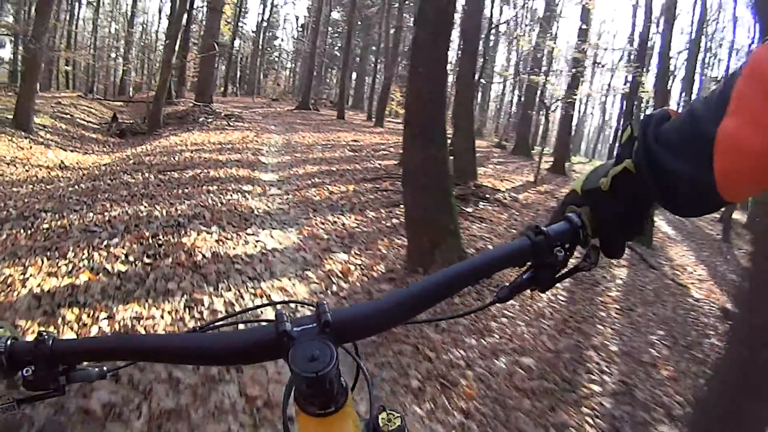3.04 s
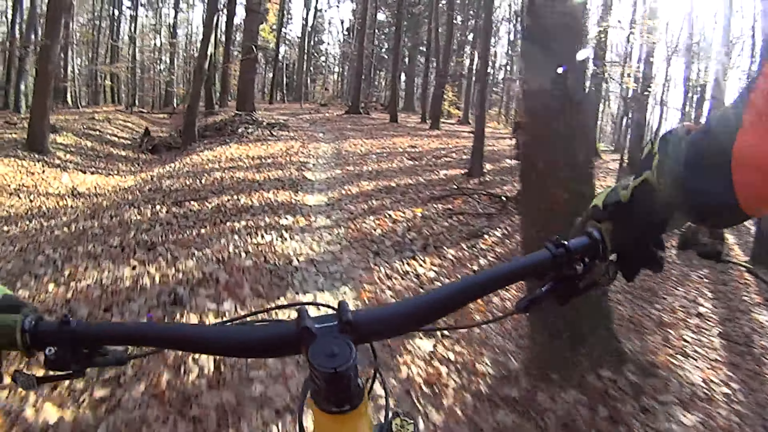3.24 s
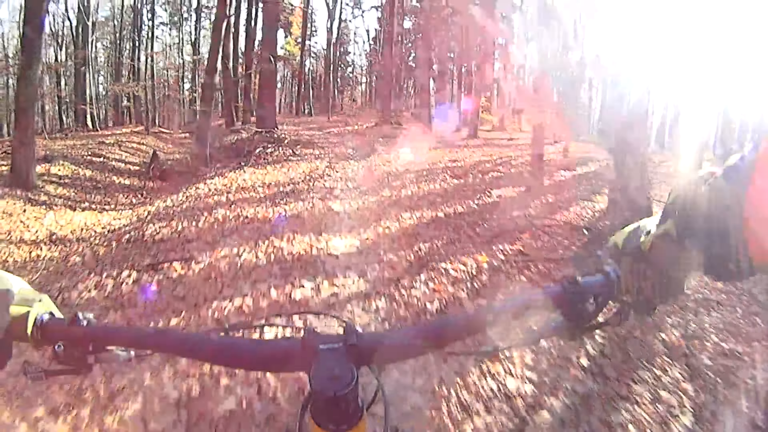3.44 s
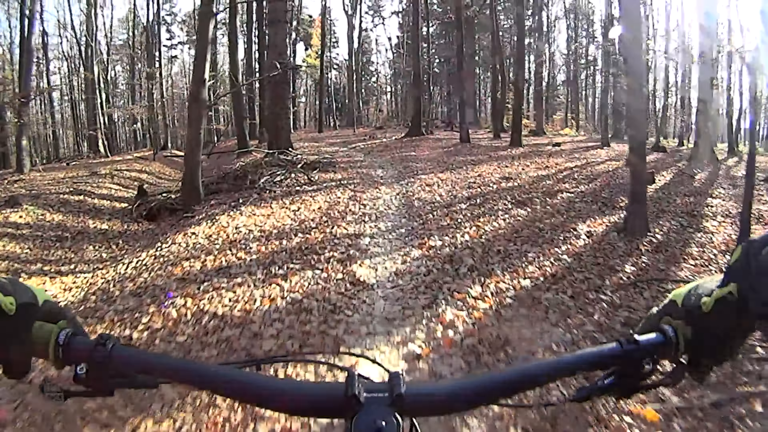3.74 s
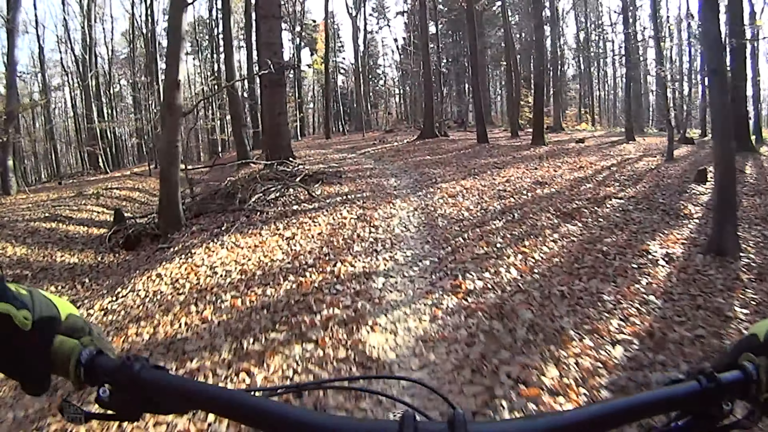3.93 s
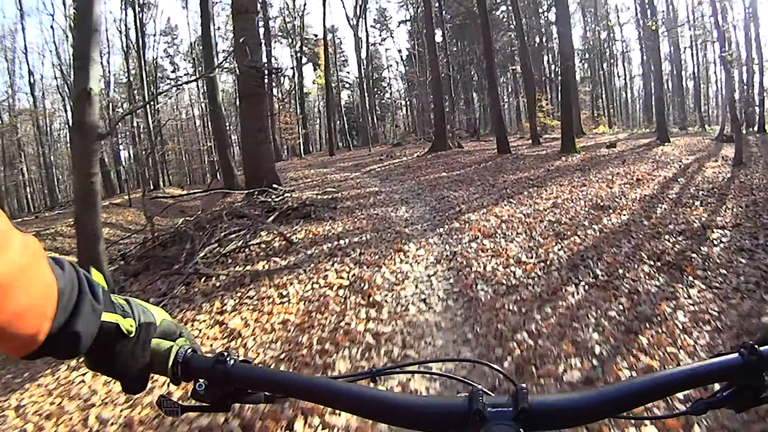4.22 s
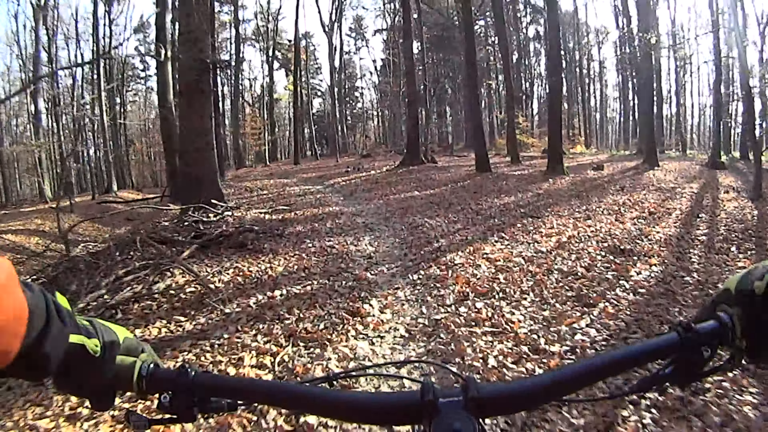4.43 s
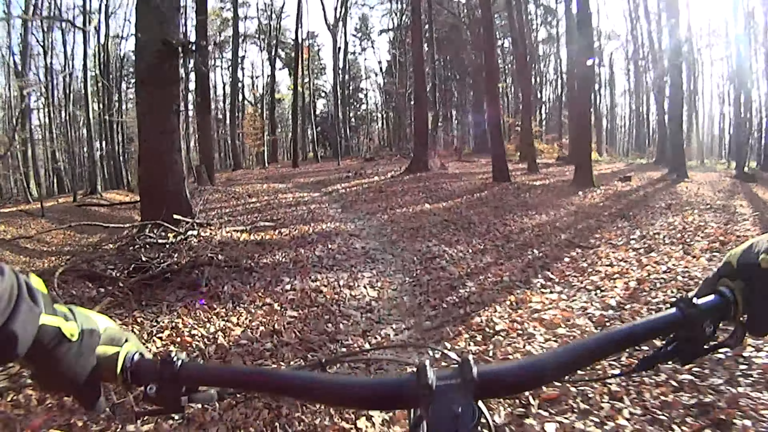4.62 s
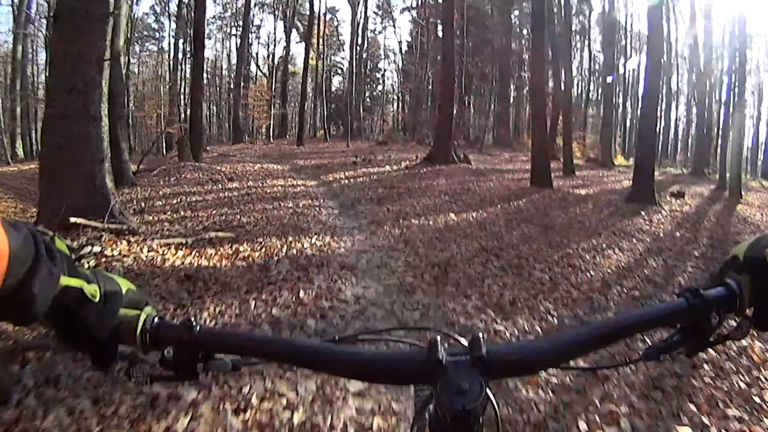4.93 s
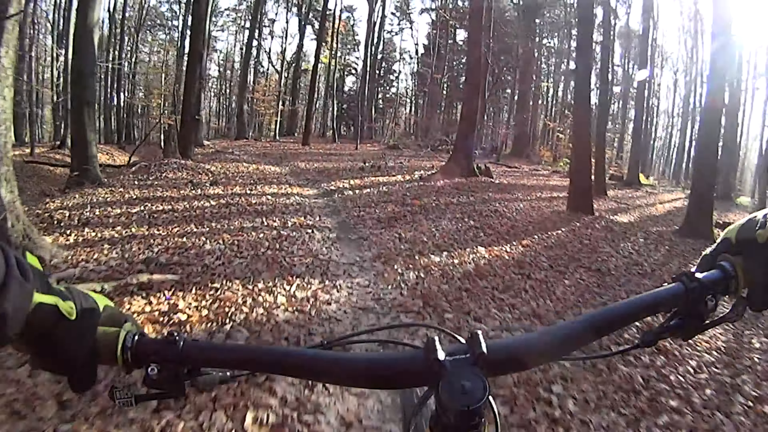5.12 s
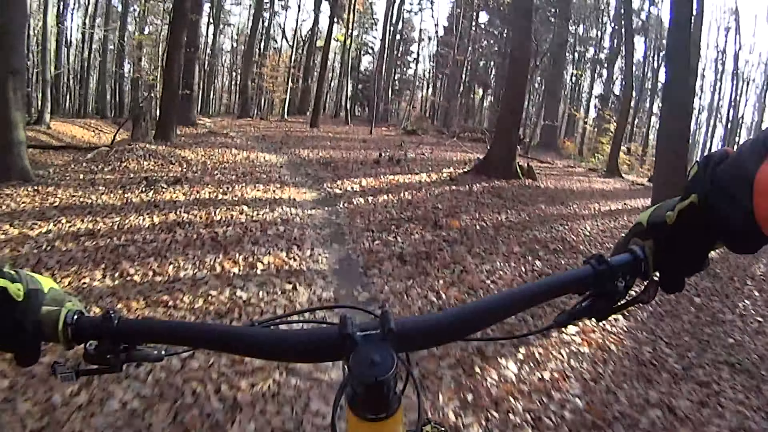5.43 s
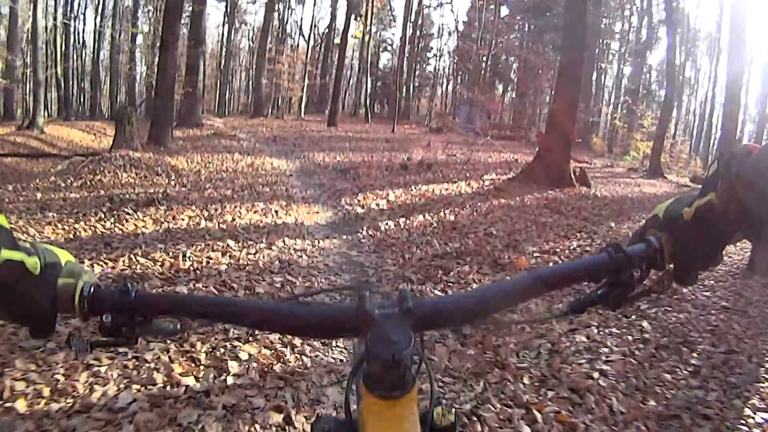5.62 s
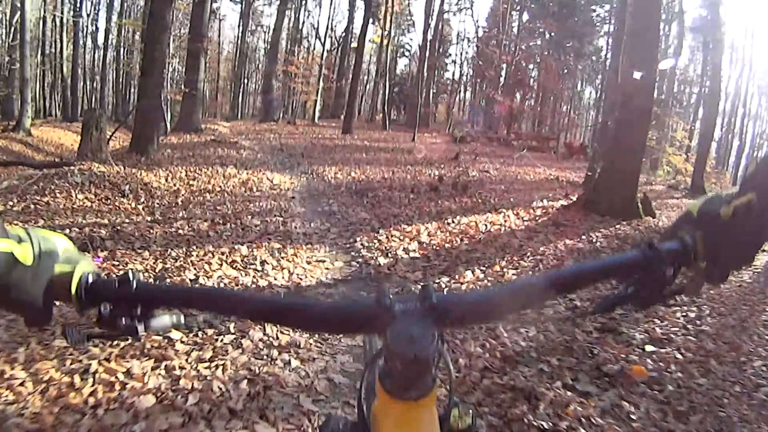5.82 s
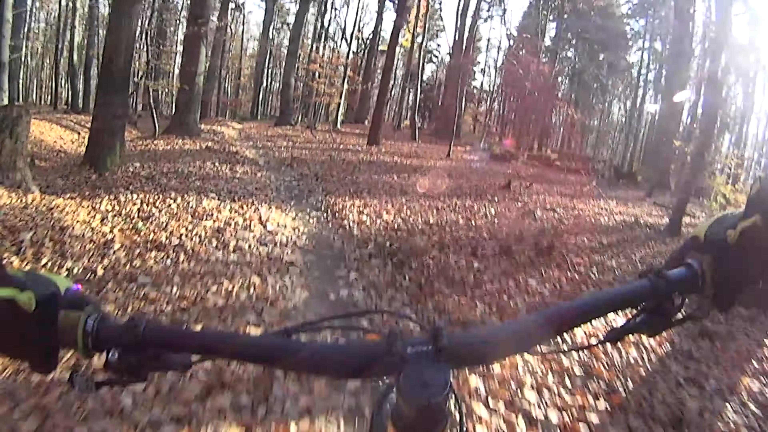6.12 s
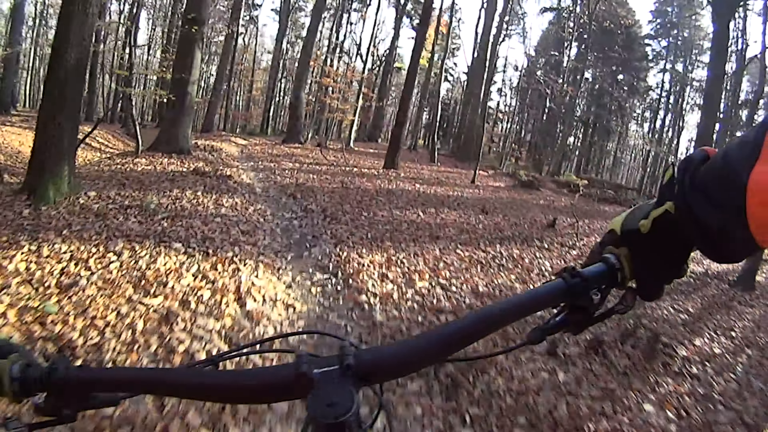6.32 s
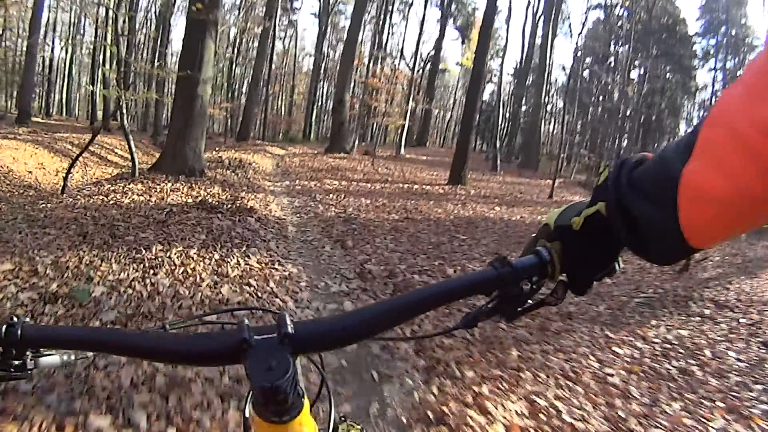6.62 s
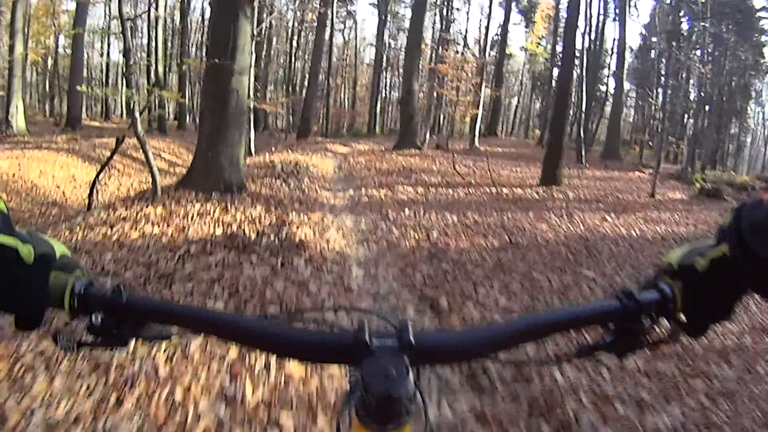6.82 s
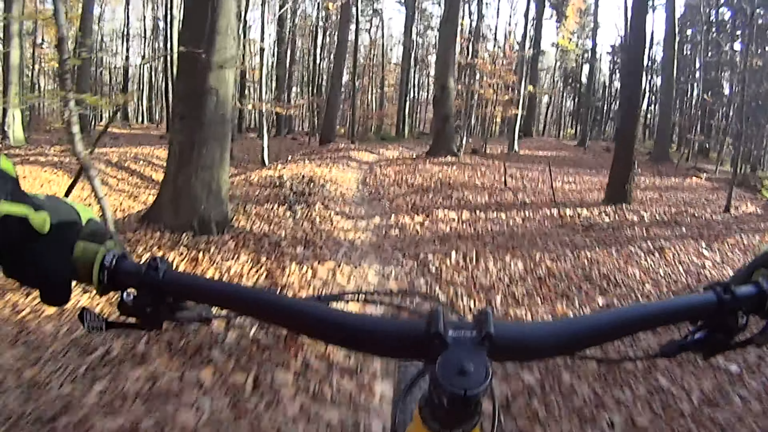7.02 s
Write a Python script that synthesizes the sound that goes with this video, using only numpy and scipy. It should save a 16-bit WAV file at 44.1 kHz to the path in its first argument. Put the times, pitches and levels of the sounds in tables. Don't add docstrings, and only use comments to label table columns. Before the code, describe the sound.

From 0 s bicycle tyres roll steadily through deep dry leaves, a continuous crisp rustle full of tiny crackles, with sharp cracks of stiff leaves and twigs. The microphones sit close in a closed plastic case, so everything is hard, boxy and narrow, over a faint low rumble of wind and jolts. A strong knock comes at 0.6 s, a few twig snaps at 1.9 s. Around 2.5 s the rattle nearly fades, leaving mostly leaves, then a light bump at 2.7 and a double knock at 3.75. From 5.3 to 6.1 s the trail is rough: grinding, knocks and one loud snap at 5.5. More clacks follow at 6.8 with a low thump. At 7.65-8.05 a violent clatter and deep jolts hit, then thick, loud leaf crunching around 8.2, a brief lightening near 8.65 amid a flurry of snaps at 8.5-8.85, and final heavy knocks at 8.9-9 s.

```python
import sys
import numpy as np
from scipy import signal
from scipy.fft import rfft, irfft
from scipy.io import wavfile
from scipy.ndimage import uniform_filter1d

SR = 44100
rng = np.random.default_rng(int(sys.argv[2]) if len(sys.argv) > 2 else 0)


def digitize_waveform(pressure):
    field = np.atleast_2d(pressure).T
    bounded = np.clip(field, -1, 1)
    quanta = np.round(bounded * 32767).astype(np.int16)
    wavfile.write(sys.argv[1], SR, quanta)


def nominal_scale(level):
    x = np.asarray(level, float) / 20
    return 10 ** x


N = 399546

# top t/s, length/s, level/dB
HEAP_ROWS = [(0.12, 0.027, 1.5), (0.22, 0.058, -4), (0.25, 0.043, 3), (0.585, 0.035, 4), (0.66, 0.042, 4),
             (0.785, 0.052, 3.5), (0.87, 0.053, 4.5), (1.26, 0.027, 1.5), (1.59, 0.061, 4.5),
             (2.45, 0.032, 2.5), (2.52, 0.024, 1.5), (3.37, 0.047, 5), (5.07, 0.085, 0.5),
             (5.22, 0.042, 5.5), (5.85, 0.03, 6.5), (6.88, 0.11, 3), (7.69, 0.03, 9), (7.77, 0.096, -3),
             (7.89, 0.026, 4), (8.0, 0.076, 5), (8.08, 0.066, 3), (8.18, 0.08, 3.5), (8.25, 0.043, 4.5),
             (8.37, 0.041, 3.5), (8.47, 0.07, 0.5), (8.63, 0.09, -4), (8.7, 0.05, -6.5), (8.76, 0.027, 0),
             (8.81, 0.016, -4)]
# t/s, shaking/dB
SHAKING_ROWS = [(0.0, 2), (0.6, 6.5), (1.2, 3), (2.0, -5.5), (2.5, -11), (2.85, 1), (3.2, -1.5), (4.9, 1),
                (5.3, 7), (5.7, 7.5), (6.25, 5.5), (6.8, 8), (7.2, 5.5), (7.6, 7.5), (7.85, 21),
                (8.25, 0.5), (8.6, 10.5), (9.06, 13)]
# start t/s, length/s, level/dB
GRIND_ROWS = [(0.345, 0.053, -34.5), (0.98, 0.022, -32.5), (1.69, 0.052, -36.5), (2.67, 0.063, -40),
              (2.88, 0.08, -41.5), (3.75, 0.043, -31.5), (4.06, 0.025, -47), (4.715, 0.047, -42.5),
              (5.36, 0.027, -36), (5.545, .04, -33), (5.603, 0.077, -31.5), (5.685, 0.063, -33.5),
              (5.83, 0.054, -36), (5.905, 0.042, -33), (6.41, .04, -41), (6.495, 0.025, -40),
              (6.64, 0.026, -33), (6.78, 0.08, -45), (6.94, .04, -38), (7.01, 0.032, -38.5),
              (7.648, 0.036, -28), (7.72, 0.026, -36), (7.745, .04, -27), (7.85, .07, -43),
              (7.93, 0.03, -34), (7.975, 0.048, -27), (8.568, 0.089, -25), (8.74, 0.15, -36),
              (8.87, 0.076, -29), (8.995, .07, -26)]


def evened(x):
    return x / np.sqrt(np.mean(x ** 2) + 1e-20)


def read(points, hz, axis=1):
    table = np.transpose(points)
    return np.interp(np.log(hz + 1), np.log(table[0] + 1), table[axis])


def curve(rows):
    return np.interp(np.arange(N) / SR, *np.transpose(rows))


def add(mix, s, sound):
    part = mix[max(round(s * SR), 0):][:len(sound)]
    part += sound[:len(part)]


def causal(gain_db):
    mirrored_db = np.concatenate([gain_db, gain_db[-2:0:-1]])
    log_gain = np.log(nominal_scale(mirrored_db))
    response = np.exp(np.conj(signal.hilbert(log_gain)))
    return np.fft.ifft(response).real[:1024]


def flicker(per_s, depth_db):
    span = max(int(SR / per_s / 2), 1)
    smooth = uniform_filter1d(uniform_filter1d(rng.standard_normal(N), span), span)
    return nominal_scale(depth_db * evened(smooth))


def random_hits(per_s, spread_db, largest):
    size = nominal_scale(spread_db * np.minimum(rng.exponential(1, N), largest))
    return size * (rng.random(N) < per_s / SR)


def grains(per_s, spread_db, low_hz, high_hz, cycles, patchy_db, count=14):
    size = random_hits(per_s, spread_db, largest=2.5)
    kind = rng.integers(0, count, N)
    t = np.arange(512) / SR
    out = np.zeros(N)
    for k, hz in enumerate(np.geomspace(low_hz, high_hz, count)):
        ring = np.sin(2 * np.pi * hz * t) * np.exp(-t * hz / cycles)
        ring = ring / np.linalg.norm(ring) * np.sqrt(hz)
        clicks = size * (kind == k) * flicker(21, patchy_db)
        out += signal.oaconvolve(clicks, ring)[:N]
    return evened(out)


def bursts(per_s, spread_db, fade_s):
    starts = random_hits(per_s, spread_db, largest=3)
    fading = signal.lfilter([1], [1, -np.exp(-1 / (fade_s * SR))], starts)
    gain = 0.64 + evened(fading)
    return gain / uniform_filter1d(gain, SR // 12)


def patchy(depth_db):
    z = signal.stft(rng.standard_normal(N + 512), nperseg=256, noverlap=192)[2]
    patches = uniform_filter1d(rng.standard_normal(z.T.shape), size=26, axis=0)
    patches = uniform_filter1d(patches, size=4, axis=1)
    coloured = z * nominal_scale(depth_db * evened(patches.T))
    return evened(signal.istft(coloured, nperseg=256, noverlap=192)[1][:N])


def swells(rows):
    out = np.zeros(N)
    for s, length, height in rows:
        u = np.linspace(0, 1, round(2 * length * SR))
        add(out, s - 0.63 * length, height * np.sin(np.pi * u ** 0.6) ** 2)
    return out


def scrapes(rows):
    rise_s = 0.002
    out = np.zeros(N)
    for s, length, db in rows:
        t = np.arange(0, length, 1 / SR)
        fall = np.cos(np.pi / 2 * t / t[-1])
        add(out, s, nominal_scale(db) * np.minimum(t / rise_s, 1) * fall)
    return out


def leaves():
    # t/s, crush level/dB
    leaf_depth = [(0.0, -31.5), (0.35, -33.5), (0.7, -33.5), (1.0, -32.5), (1.34, -29.5), (1.64, -28),
                  (2.15, -28), (2.4, -31.5), (2.75, -27), (3.13, -32), (3.7, -27), (4.4, -31), (5.6, -29.5),
                  (6.45, -32.5), (6.9, -27), (7.75, -30), (8.23, -22.5), (9.06, -28.5)]
    bump_crunch = 0.05
    dull_hz, dull_lags, usual_db = 3800, 0.32, -32.5

    crunch = bursts(70, spread_db=4.5, fade_s=0.0074)
    bed = patchy(depth_db=1.5) * (0.95 + 0.1 * crunch) * flicker(24, depth_db=1.07)
    crackle = grains(2600, spread_db=3.0, low_hz=1840, high_hz=6850, cycles=1.3, patchy_db=7.5)
    crackle = crackle * (0.063 + 0.45 * crunch)
    ticks = grains(140, spread_db=1.5, low_hz=2840, high_hz=5170, cycles=2.2, patchy_db=-3.0, count=3)
    texture = nominal_scale(1.0) * bed + nominal_scale(-7.0) * crackle + nominal_scale(-15) * ticks

    level_db = curve(leaf_depth) + swells(HEAP_ROWS)
    crush = (nominal_scale(level_db) + bump_crunch * scrapes(GRIND_ROWS)) * texture
    dull = signal.lfilter(*signal.butter(1, dull_hz, fs=SR), crush)
    bright = crush - dull
    return bright + dull * nominal_scale(-dull_lags * (level_db - usual_db))


def rattle():
    rest_db = -49.5
    skip_quiets = 0.93

    chatter = grains(3000, spread_db=1.5, low_hz=433, high_hz=2173, cycles=2.45, patchy_db=1.5)
    chatter = chatter * (1.9 + 0.5 * bursts(98, spread_db=9.5, fade_s=0.0071))
    steady = chatter / np.sqrt(uniform_filter1d(chatter ** 2, size=1500) + 1e-6)
    calm_db = skip_quiets * np.minimum(swells(HEAP_ROWS), 0)
    level = nominal_scale(rest_db + curve(SHAKING_ROWS) + calm_db) + scrapes(GRIND_ROWS)
    flecks = grains(28, spread_db=2.0, low_hz=1330, high_hz=1500, cycles=3.1, patchy_db=0.0, count=2)
    return nominal_scale(-51) * flecks + nominal_scale(5.5) * level * steady


def rumble():
    # f/Hz, level/dB
    wind_colour = [(20, 6), (45, -2.5), (105, -3.5), (160, -3), (250, -6.5), (400, -10.5), (700, -18),
                   (1500, -28.5)]
    # t/s, peak level/dB, f/Hz
    root_jolts = [(0.617, -36, 127), (2.69, -40, 140), (5.354, -27, 127), (5.525, -26.5, 128),
                  (5.686, -30.5, 78.6), (5.906, -32, 58), (6.489, -32, 150), (6.633, -32.5, 61.5),
                  (6.809, -22, 105), (6.995, -34, 90.5), (7.411, -47, 83.4), (7.706, -19.5, 108),
                  (7.795, -15, 90.5), (7.878, -17.5, 135), (7.984, -25, 71.5), (8.051, -23, 71.4),
                  (8.63, -27.5, 109), (8.863, -18.5, 102), (8.913, -17, 89), (8.988, -23.5, 116)]
    wind_db, follows = -50, 0.29
    rise_s, stirs_s, stirs_db = 0.0183, 0.038, -16

    hz = np.fft.rfftfreq(N, 1 / SR)
    bounce_db = 4 / (1 + ((hz - 102) / 25) ** 2)
    colour = nominal_scale(read(wind_colour, hz) + bounce_db)
    both, own = (evened(irfft(rfft(rng.standard_normal(N)) * colour, N)) for _ in range(2))
    stirred = swells([(s + rise_s, stirs_s, nominal_scale(db + stirs_db)) for s, db, _ in root_jolts])
    level = nominal_scale(wind_db + follows * curve(SHAKING_ROWS)) + stirred
    level = level * flicker(31, depth_db=2.5)

    jolts, rocks = np.zeros(N), np.zeros(N)
    t = np.arange(2600) / SR
    for (s, db, pitch), turn in zip(root_jolts, rng.random(len(root_jolts))):
        push = nominal_scale(db - 0.5) * np.exp(-((t - rise_s) * pitch / 0.83) ** 2)
        shell = 0.28 * np.sin(2 * np.pi * 470 * t) + 0.16 * np.sin(2 * np.pi * 1.86 * pitch * t)
        add(jolts, s, push * np.cos(2 * np.pi * (pitch * (t - rise_s) + turn)))
        add(rocks, s, push * shell)
    left = level * both + nominal_scale(-5.0) * jolts + rocks
    right = level * (1.12 * both + 0.21 * own) + nominal_scale(-1.0) * jolts - rocks
    return np.array([left, right])


def snaps():
    # t/s, peak level/dB, f/Hz
    twigs = [(0.2344, -20, 3890), (0.3795, -21, 2770), (0.5722, -18, 3100), (0.6497, -18, 2930),
             (0.7744, -20, 3030), (1.255, -21, 3380), (1.8971, -18, 2850), (1.916, -16, 2860),
             (1.9336, -20, 2850), (2.0193, -19, 3200), (2.5216, -14.5, 3460), (3.6591, -20, 3900),
             (4.1885, -20, 3340), (4.7147, -20, 3660), (5.3695, -17, 2780), (5.464, -21, 2800),
             (5.4941, -7.5, 3300), (5.8957, -17, 2620), (6.0252, -15.5, 3900), (7.1052, -18.5, 2820),
             (7.3961, -19, 2940), (7.5504, -18, 3030), (8.5038, -14, 3200), (8.553, -14, 2340),
             (8.5704, -8, 2630), (8.6596, -14.5, 3650), (8.6971, -15.5, 2970), (8.742, -13.5, 3300),
             (8.7786, -15, 2590), (8.8338, -14.5, 3010)]
    # t/s, peak level/dB
    stiff_leaves = [(0.1127, -13.5), (0.128, -15.5), (0.594, -21), (0.875, -24), (0.7804, -14),
                    (1.5875, -19), (1.6, -18), (1.732, -15), (1.741, -15.5), (1.8342, -21), (2.219, -17),
                    (3.0599, -22), (3.267, -19), (3.607, -22), (4.0565, -22), (4.8295, -17.5),
                    (5.0925, -21), (5.362, -19), (5.424, -22), (5.8526, -18), (5.9837, -11.5),
                    (6.2735, -27), (6.3758, -27), (6.771, -14.5), (8.036, -21), (8.0593, -15),
                    (8.2367, -16), (8.9293, -16.5)]
    leaf_hz = 5090

    out, t = np.zeros(N), np.arange(700) / SR
    rows = list(twigs) + [(s, db, leaf_hz) for s, db in stiff_leaves]
    band = signal.butter(2, [2300, 6500], "band", fs=SR)
    splinters = signal.lfilter(*band, rng.standard_normal((len(rows), len(t))))
    crack = 0.63 * np.cos(2 * np.pi * 4300 * t) * np.exp(-t / 0.00036)
    for (s, db, hz), noise in zip(rows, splinters):
        ring = 0.62 * np.cos(2 * np.pi * hz * t) * np.exp(-t / 0.001)
        tail = 0.4 * noise * np.exp(-t / 0.0062)
        add(out, s, nominal_scale(db + 1.5) * (crack + ring + tail))
    return out


def knocks():
    # t/s, peak level/dB, f/Hz
    thuds = [(0.631, -13, 1060), (0.746, -27, 980), (0.992, -31, 1210), (2.706, -25, 1240),
             (5.369, -15, 1000), (5.549, -13, 1060), (5.641, -20.5, 1110), (5.838, -28, 1280),
             (6.205, -29, 990), (7.727, -15, 1130), (7.736, -7.5, 1100), (8.006, -15.5, 1240),
             (8.607, -24, 1270), (8.907, -9, 1010), (9.018, -11, 982)]
    # t/s, peak level/dB, f/Hz
    light_knocks = [(0.357, -14.5, 1400), (0.89, -25, 1740), (0.986, -19, 1500), (1.696, -19, 1590),
                    (2.678, -25, 1400), (2.736, -19, 1530), (3.754, -13.5, 1390), (3.763, -13, 1610),
                    (4.457, -25, 1350), (4.909, -20.5, 1350), (5.625, -13.5, 1640), (5.73, -17.5, 1390),
                    (5.861, -10, 1690), (6.048, -14.5, 1520), (6.582, -16.5, 1510), (6.779, -11.5, 1400),
                    (6.832, -16, 1760), (7.201, -18, 1400), (7.396, -22.5, 1400), (7.645, -13.5, 1400),
                    (7.763, -5.5, 1380), (7.788, -9.5, 1550), (7.86, -12, 1740), (7.973, -12, 1460),
                    (8.152, -16.5, 1400), (8.571, -27, 1400), (8.592, -8.5, 1400), (8.871, -28, 1750),
                    (9.003, -14.5, 1610)]
    rows = [(*row, 6, -2.5) for row in thuds]
    rows += [(*row, 3.4, -14) for row in light_knocks]

    out, t = np.zeros(N), np.arange(2400) / SR
    band = signal.butter(2, [800, 2900], "band", fs=SR)
    grit = signal.lfilter(*band, rng.standard_normal((len(rows), len(t))))
    tick = 0.1 * np.sin(2 * np.pi * 2500 * t) * np.exp(-t / 0.0051)
    modes = np.sin(2 * np.pi * 520 * t) + 1.9 * np.sin(2 * np.pi * 800 * t)
    for (s, db, hz, cycles, rock_db), noise in zip(rows, grit):
        u = t * hz / cycles * 5.1
        ring = u * np.exp(1 - u) * np.sin(2 * np.pi * hz * t)
        rock = nominal_scale(rock_db + 1.0) * np.exp(-t / 0.0019) * modes
        chatter = 0.19 * noise * np.exp(-t / 0.032)
        add(out, s + 0.000812, nominal_scale(db + 3.0) * (ring + rock + tick + chatter))
    return out


def through_case(x):
    # f/Hz, level/dB
    case_colour = [(250, -18.5), (480, -10), (750, -12), (1050, -3), (1390, -2), (1700, -3.5), (1880, -9.5),
                   (2830, 5), (4200, -1.5), (5000, 5), (5700, -3.5), (6450, -1.5), (7000, -1.5),
                   (11000, -13.5)]
    # f/Hz, width/Hz, level/dB
    shell_modes = [(516, 24, 5), (733, 17, 10), (1060, 58, 3.5), (1240, 23, 7), (1400, 110, 6),
                   (1597, 14, 6.5), (1690, 38, 6.5), (2020, 52, 0), (2368, 38, 7.5), (2820, 83, 1),
                   (3320, 170, 1), (4990, 33, 1.5)]
    # f/Hz, level below/dB, lateness/rad, likeness/0-1
    right_port = [(250, 0, .5, .7), (450, 0, 2.6, .9), (680, 3, 2.4, .6), (850, -2, .6, .65),
                  (1100, 4, -.3, .8), (1400, 3.5, .1, .94), (1800, 3, -.8, .82), (1930, -1.5, -1.3, .2),
                  (2400, 2, -.4, .88), (3100, -.5, -1.2, .85), (3500, -2, 0, .87), (5000, 2, -.2, .94),
                  (7000, 1.2, -.5, .55), (11000, .8, -.2, .6)]

    hz = np.fft.rfftfreq(4096, 1 / SR)
    modes_db = sum(db / (1 + (2 * (hz - f) / width) ** 2) for f, width, db in shell_modes)
    left = signal.oaconvolve(x, causal(read(case_colour, hz) + modes_db))[:N]

    z = signal.stft(left, nperseg=256, noverlap=192)[2]
    scrambled = z * np.exp(2j * np.pi * rng.random(z.shape[::-1]).T)
    other = signal.istft(scrambled, nperseg=256, noverlap=192)[1][:N]
    other = other * np.std(left) / np.std(other)

    hz = np.fft.rfftfreq(N, 1 / SR)
    like = read(right_port, hz, axis=3)
    shifted = rfft(left) * np.exp(-1j * read(right_port, hz, axis=2))
    right = like * shifted + np.sqrt(1 - like ** 2) * rfft(other)
    return np.array([left, irfft(right / nominal_scale(read(right_port, hz)), N)])


def scene():
    return through_case(leaves() + rattle() + snaps() + knocks()) + rumble()


def top_cut(x):
    return signal.sosfilt(signal.butter(12, 11610, fs=SR, output="sos"), x)


def record(dry):
    edge_hz = 11130
    passed = np.fft.rfftfreq(N, 1 / SR) < edge_hz
    limited = irfft(rfft(dry) * passed, N)
    return top_cut(limited)


dry = scene()
out = record(dry)
digitize_waveform(out)
```